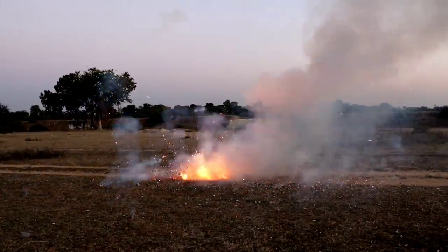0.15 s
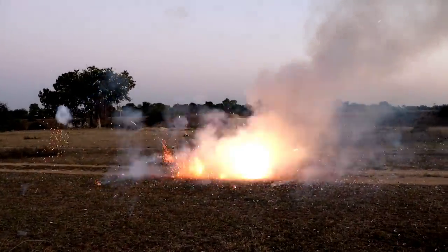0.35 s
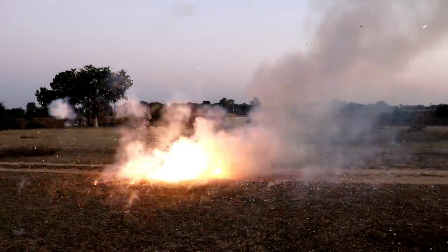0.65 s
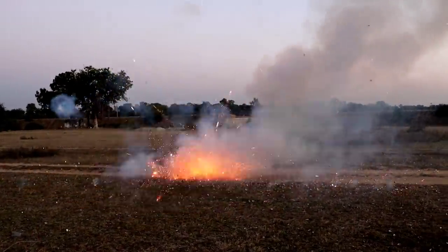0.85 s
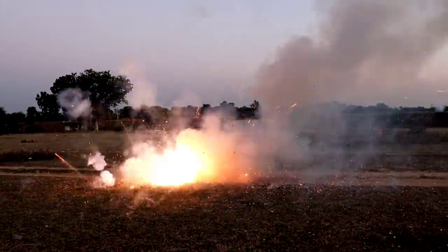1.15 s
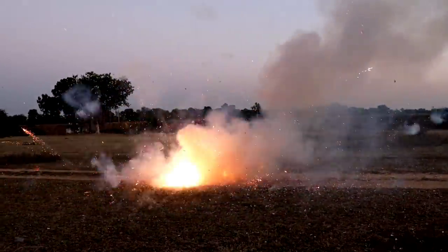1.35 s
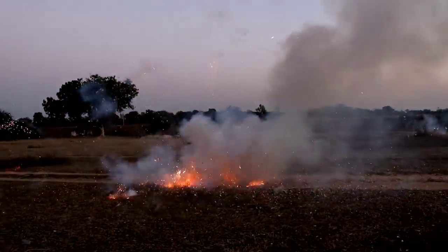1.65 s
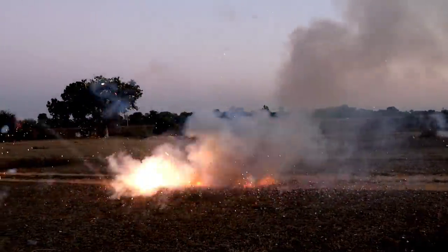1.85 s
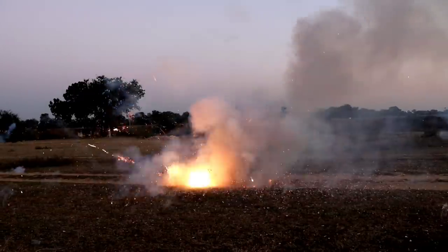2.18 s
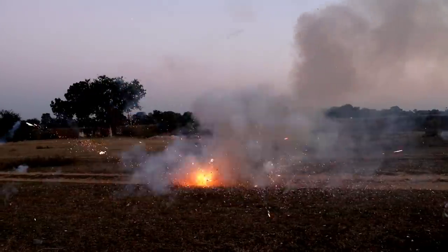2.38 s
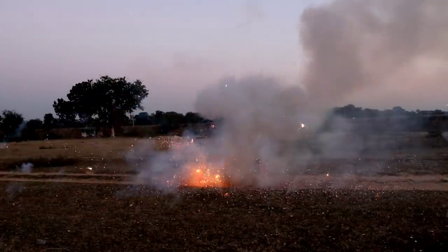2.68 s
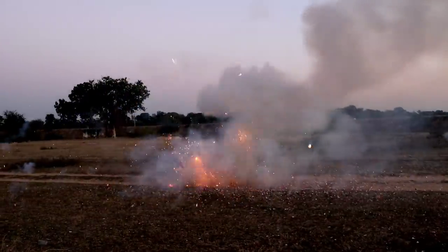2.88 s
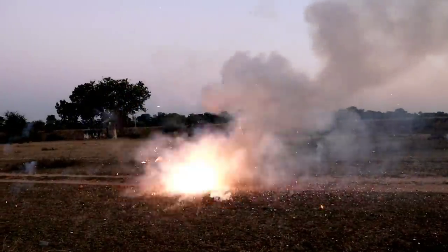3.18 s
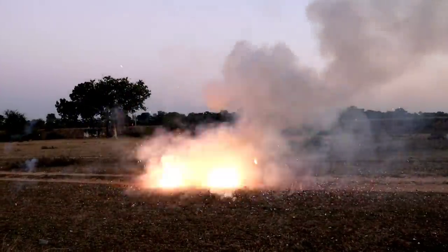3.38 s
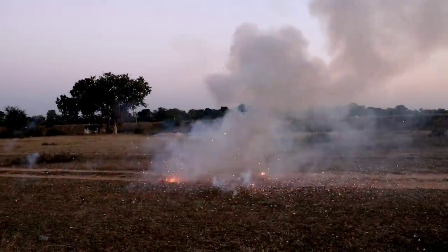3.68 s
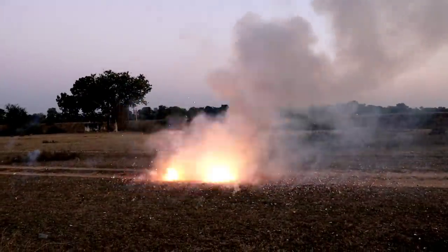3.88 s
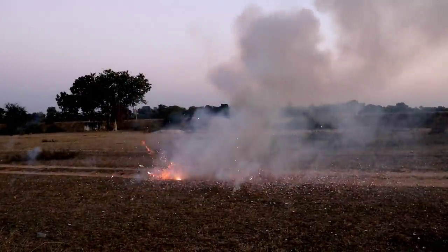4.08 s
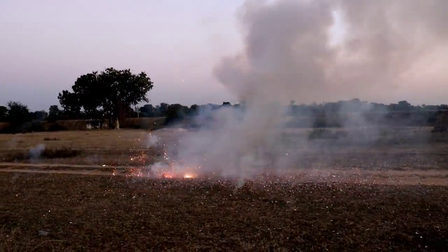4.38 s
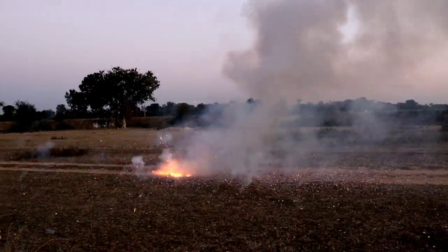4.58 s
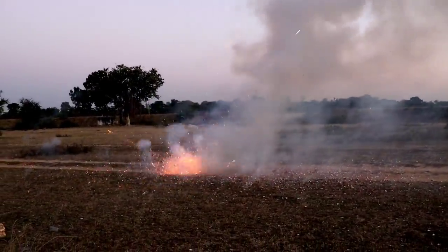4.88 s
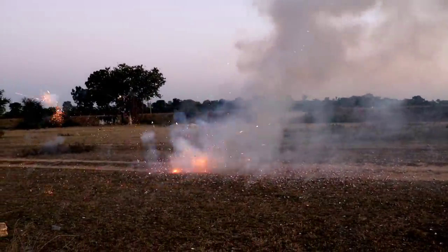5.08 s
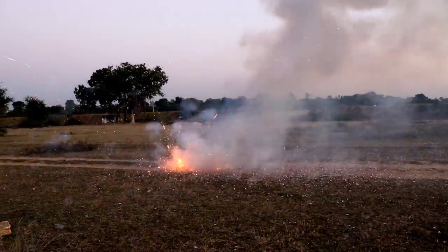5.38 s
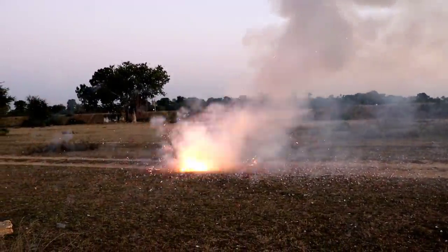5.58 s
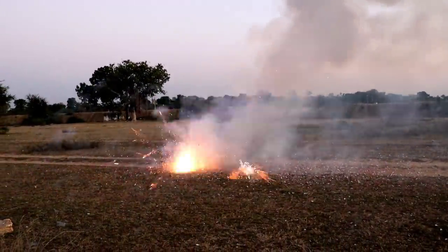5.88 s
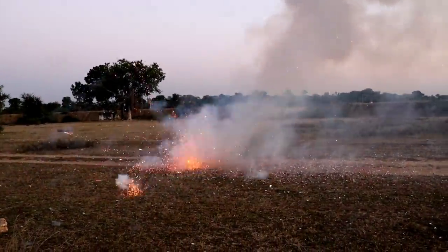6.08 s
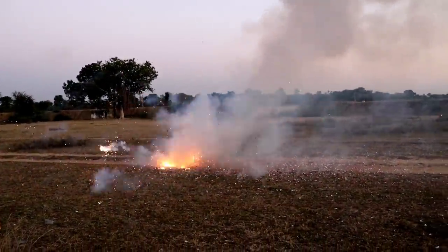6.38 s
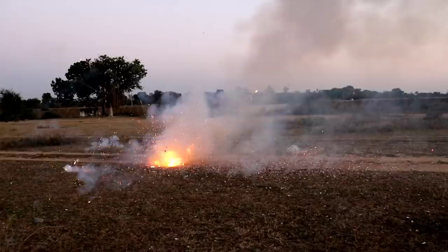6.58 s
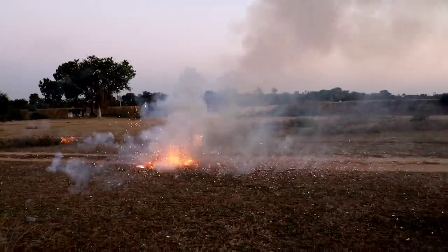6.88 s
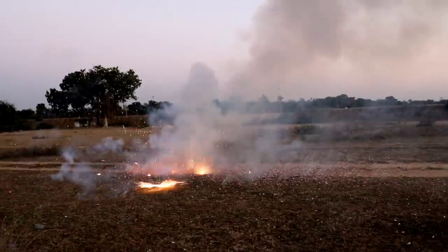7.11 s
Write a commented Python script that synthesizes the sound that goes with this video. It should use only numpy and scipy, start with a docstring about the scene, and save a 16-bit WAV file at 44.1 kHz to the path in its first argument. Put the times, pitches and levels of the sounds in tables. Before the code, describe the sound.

Dense, crackling firecracker chain outdoors, sharp distorted bangs and quick salvos slamming the microphone, with short dull scatter from ground, bushes and far trees.

```python
"""Over faint steady far noise a long string of firecrackers goes off in an open stubble field, singly and in salvos.
Each blast overloads a microphone: it jumps to its upper stop, slams to its lower stop and swings back.
Stubble, bushes and far trees scatter each bang as decaying patchy noise; a bank returns a short mid-pitched slap.
Soft muffled blasts and faint random pops come between: a rounded push, then a longer pull.
Gain control sinks while the bangs come thick."""
import sys
import numpy as np
from scipy import signal
from scipy.fft import rfft, irfft
from scipy.io import wavfile
from scipy.ndimage import uniform_filter1d

SR = 44100
rng = np.random.default_rng(int(sys.argv[2]) if len(sys.argv) > 2 else 0)


def pcm_store(signal):
    """Save signal as 16-bit PCM."""
    levels = np.round(np.clip(np.atleast_2d(signal), -1, 1) * 32767)
    wavfile.write(sys.argv[1], SR, levels.astype(np.int16).T)


N = 319720

# far echo spectrum: f/Hz, relative level/dB
FAR_SPECTRUM = [(40, -11), (260, -0.5), (900, -8), (2800, -23.5), (8500, -40.5), (16000, -52)]
# near scatter spectrum: f/Hz, relative level/dB
GROUND_SPECTRUM = [(100, 4), (500, 4), (1600, -6.5), (3900, -18.5), (7800, -20.5), (15000, -27.5)]
# single overloading blasts: t/s, swing back/share of travel 0-1, crack sharpness/dB
SINGLE_BLASTS = [(0.0106, 0.06, -32), (0.1273, 0.97, -12), (0.2631, 0.06, -15), (0.3293, 0.7, -14),
                 (0.3455, 0.83, -13), (0.3916, 0, -15), (0.4116, 0.3, -7), (0.4442, 0.05, -20),
                 (0.4594, 0.85, -11), (0.5984, 0.84, -9), (0.684, 0.5, -28), (0.711, 0.5, -7),
                 (0.7838, 0.47, -29), (0.848, 0.22, -11), (0.8689, 0.8, -7), (0.8888, 0.66, -22),
                 (0.9008, 0.08, -9), (0.9068, 0.66, -9), (0.9899, 0.94, -12), (1.0081, 0.15, -20),
                 (1.0257, 0.8, -2), (1.1783, 0.05, -17), (1.2761, 0.8, 1), (1.309, 0.09, -16),
                 (1.3496, 1, -28), (1.4235, 0.74, -21), (1.5345, 1, -17), (1.5553, 0.6, -24),
                 (1.6621, 0.07, -35), (1.745, 0.05, -31), (1.7973, 0.8, -25), (1.8457, 0.5, -11),
                 (1.8897, 0.73, -21), (1.98, 0.93, -10), (1.9935, 0.7, -11), (2.004, 0.85, -50),
                 (2.0231, 0.56, -22), (2.039, 0.87, -10), (2.0712, 0.97, -7), (2.0846, 0.3, -11),
                 (2.11, 0.95, -12), (2.1535, 1, -32), (2.1737, 0.4, -21), (2.314, 0.05, -34),
                 (2.496, 0.03, -18), (2.5158, 0.64, -5), (2.676, 0.35, -15), (2.7161, 0.02, -10.5),
                 (2.7506, 0.43, -5), (2.7816, 0.93, -7), (2.8817, 0.87, -8), (3.0127, 0.07, -7.5),
                 (3.0712, 0.9, 1), (3.097, 0.93, -23.5), (3.3364, 0.53, -8.5), (3.3555, 0.4, -4),
                 (3.3696, 0.97, -22), (3.3805, 0.09, -20), (3.5, 0.27, -19.5), (3.5346, 0.97, -16),
                 (3.5906, 0.85, -18.5), (3.6475, 1, -2), (3.6539, 0.23, -24), (3.9004, 0.04, -14),
                 (3.9327, 1, -21), (3.9767, 0.86, -21), (4.0513, .8, -10), (4.177, 0.6, -15.5),
                 (4.3079, 0.87, -27), (4.3105, 0.01, -20), (4.432, 1, -2), (4.456, 0.97, -7),
                 (4.4766, 0.65, -26), (4.555, 1, -19), (4.5899, 0.8, -6.5), (4.6047, 0.25, -25),
                 (4.8395, 0.7, -26), (4.867, 0.06, -30), (4.9224, 0.83, -22), (4.987, 0.1, -29),
                 (5.0215, 0.03, -28), (5.117, 0.08, -34), (5.2333, 0.25, -26), (5.3535, 1.0, -11.5),
                 (5.4407, 0.95, -4), (5.457, 0.38, -22), (5.485, 0.34, -8), (5.5872, 0, -15),
                 (5.6057, 0.03, -28), (5.6706, 1, -3), (5.6908, 0.98, -24), (5.7488, 0.07, -35),
                 (5.799, 0.22, -26), (5.957, 0.09, -25), (5.9663, 0.3, -10), (6.0082, 0.05, -9),
                 (6.0186, 1, -7), (6.0362, 1, -8), (6.049, 0.8, -8), (6.125, 0.46, -22), (6.1576, .6, -9),
                 (6.1883, 0, -23), (6.2022, 1, -5.5), (6.33, 0.73, -17), (6.354, 0.14, -13.5),
                 (6.4825, 0.29, -12.5), (6.511, 0.08, -23), (6.546, 0.96, -12), (6.5548, 0, -25),
                 (6.6151, 0.51, -19), (6.6837, 0.66, -13), (6.699, 0.97, -30), (6.7448, 0.54, -33),
                 (6.8296, 0.73, -22.5), (6.858, .2, -45), (6.8612, .9, -14), (6.8886, 0.95, -16),
                 (6.906, 0.88, -26), (6.927, 0.12, -25), (6.9659, 0.96, -24.5), (6.9988, 0.09, -25),
                 (7.0127, 0.35, -31), (7.0959, 0.65, -26), (7.1162, 0.74, -22), (7.1294, 0.65, -48),
                 (7.157, 1, -12), (7.1765, 0.14, -31), (7.199, 0.98, -20), (7.2081, 0.79, -35),
                 (7.2364, 1, -15)]
# quick salvos of neighbouring crackers: start t/s, length/ms, swing back after first blast/0-1,
# swing back after last/0-1, then any crackers in between/ms after start
CRACKER_SALVOS = [(0.1516, 3.14, 0.82, .9), (0.1974, 7.8, .1, .3, 3.2), (0.2696, 9.2, 0.8, 0.94, 4.1),
                  (0.3113, 8.3, 0.7, 0.98, 2.5, 4.6), (0.3524, 2.95, 0.85, 0.4), (0.4353, 1.4, .6, .04),
                  (0.4748, 10, .3, .4, 6), (0.5203, 12.1, .94, .98), (0.5573, 4.5, .3, 0.06),
                  (0.6104, 1.85, 0.9, 0.7), (0.6532, 2.7, .95, 0.03), (0.7294, 3.4, .3, 0.6),
                  (0.7519, 7.1, .09, 1), (0.7943, 2.4, 0.6, 0.2), (0.8123, 4.9, .3, .8, 2.8),
                  (0.8252, 2.7, 0.7, 0.43), (0.8562, 3.63, 0.7, .3), (0.9194, 5.0, 1, 0.93),
                  (0.9397, 6.26, .2, 0.06, 4), (0.9548, 10.2, 1, .03), (1.0331, 2.2, 0.2, 0.2),
                  (1.0543, 9.3, 0.83, .09, 3.5, 4.8), (1.0745, 18.7, .98, .97), (1.105, 2.2, .3, 0.96),
                  (1.1186, 4.4, .6, 0.07), (1.1338, 3, 0.2, 0.06), (1.1433, 1.3, .3, 0.9),
                  (1.1521, 11.4, 0.2, 0.87, 3.6, 7.6), (1.171, 3.9, 0.2, 1),
                  (1.188, 11, .3, 0.97, 2.8, 5.3, 7.2), (1.2264, 5.1, 0, 0.02), (1.24, 5.3, 0.93, 0.2),
                  (1.2864, 5.1, 0.64, 0.1), (1.329, 6.3, .75, 0.97, 1.8),
                  (1.3763, 14.9, 0.77, .6, 4.2, 7.9, 10), (1.4714, 1.4, 0.4, 0), (1.4879, 2.1, 0.4, 0),
                  (1.5045, 3.24, 0.79, 0.75), (1.514, 5.84, 0, 0.89), (1.6951, 2.8, 0.47, 0.06),
                  (1.782, 5.3, .7, 0.65, 2.4), (1.8998, 3.9, 0.14, 0.3), (1.9399, 5.3, 1, 0.09),
                  (2.053, 4.4, 0.56, 0.07), (2.2175, 8.7, .8, 1, 3.8, 6.3), (2.2584, 9.3, .67, .07),
                  (2.3237, 5.2, 0.77, .4, 3), (2.414, 1.42, 0.8, 0), (2.431, 4.2, 0.07, .4),
                  (2.4676, 9.4, .05, .96), (2.6424, 7.4, .66, .9), (2.6643, 5.5, 0.4, 0.84),
                  (3.0273, 5.3, 1, 0.3), (3.6421, 3.64, 0.82, 0.8), (4.1423, 3.7, 0.92, 0.7),
                  (4.8244, 7.1, 0.66, 0.74), (4.847, 3.3, 0, 0.06), (4.9564, 11.2, 0.8, .3, 5.8),
                  (5.001, 5.07, 0, 0.05), (5.2203, 1.55, .95, 0.03), (5.3159, 12.3, .84, .07),
                  (5.4223, 4.4, 0.65, 0.47), (5.4706, 4.38, 0.08, 0.02), (5.7242, 7.2, .52, .4),
                  (5.7809, 5.96, 0.8, 0.92), (5.8959, 11.4, .15, .1, 6), (5.9226, 13.1, 0, .93),
                  (5.945, 3.2, 0.33, 1), (5.9874, 10.2, .15, 0.05, 6), (6.0677, 3.7, 0, .96),
                  (6.1022, 12.2, .9, .97), (6.3694, 8, .9, 0.4, 1.4), (6.4919, 1.83, 0.34, 0.24),
                  (6.6319, 3.55, 1, .2), (6.648, 8.4, .63, 1), (6.712, 4.67, 0.87, .95), (6.768, 1.4, 1, 1),
                  (7.0196, 4.4, 0.39, 1.0), (7.0944, 1.2, 0, .5, .6)]
# crackers muffled by smoke and stubble, too soft to reach the stops: t/s, peak level/dB
MUFFLED_BLASTS = [(0.3753, -2.5), (2.3689, -15), (3.1161, -3.5), (4.735, -29), (4.758, -28.5), (5.1493, -6),
                  (5.7111, -19), (6.4075, -12)]

REST = 0.16  # idle position; lower stop 0, upper stop 1
FIRST_CRACK_DB, LATER_CRACK_DB = -15, -16  # smoke dulls the later crackers of a salvo
CRACK_SPREAD_DB = 4.0  # crackers differ in sharpness, +-
INNER_BACK, INNER_SPREAD = .75, .25  # swing back of crackers inside a salvo, and its stray
DIP_S, DIP_WIDTH_S, DIP_DEPTH = 0.00342, 0.00035, 0.28  # ground bounce suction; greatest depth
FLIP_HALF_WIDTH_S, FLIP_AT_S = .000022, np.array([-.00011, .00009, .0003])  # moments re slam, before stray
SLAP_DELAY_S, SLAP_SPREAD_S = 0.027, 0.002  # bank a few metres off
SLAP_HZ, SLAP_WIDTH_HZ, SLAP_DB = 1050, 790, -37
CEILING, EDGE_HZ = .97, 16500


def gain_of(db):
    """Amplitude factor of a level in dB."""
    return 10 ** (np.asarray(db) / 20)


def evened(x):
    """Scales x to rms 1."""
    return x / np.sqrt(np.mean(x ** 2) + 1e-20)


def fade(x, seconds):
    """Every impulse in x decays exponentially with this time constant."""
    return signal.lfilter([1], [1, -np.exp(-1 / (seconds * SR))], x)


def coloured(x, points):
    """Gives x the spectrum drawn by points, at rms 1."""
    f, db = np.transpose(points)
    hz = np.fft.rfftfreq(N, 1 / SR)
    level_db = np.interp(np.log(hz + 1), np.log(f), db)
    return evened(irfft(rfft(x) * gain_of(level_db), N))


def lumpy(lump_db, frames):
    """Noise in patches of time and pitch, as separate small echoes of different colour make it."""
    re, im, lumps = rng.standard_normal((N // 32 + 4, 65, 3)).T
    lumps = uniform_filter1d(lumps, max(round(frames), 1), axis=1)
    lumps = evened(uniform_filter1d(lumps, size=5, axis=0))
    spectrum = (re + 1j * im) * gain_of(lump_db * lumps)
    return signal.istft(spectrum, nperseg=128, noverlap=96)[1][:N]


def crackers():
    """All overloading blasts in order (s, swing back, crack dB), the salvos spread out into crackers."""
    blasts = [tuple(row) for row in SINGLE_BLASTS]
    strays = rng.uniform(-1, 1, (len(CRACKER_SALVOS), 2, 5))
    for (s, ms, first, last, *inner), (swing, sharp) in zip(CRACKER_SALVOS, strays):
        at = s + np.array([0, *inner, ms]) / 1000
        k = np.arange(len(at))
        inner_backs = INNER_BACK + INNER_SPREAD * swing[:len(inner)]
        backs = np.clip([first, *inner_backs, last], 0, 1)
        crack_db = np.where(k > 0, LATER_CRACK_DB, FIRST_CRACK_DB) + CRACK_SPREAD_DB * sharp[k]
        blasts += zip(at, backs, crack_db)
    return sorted(blasts)


def scatter(blasts):
    """Bangs return from stubble at once, bushes soon after, far trees for long, over a steady far floor."""
    power = np.zeros(N)
    for s, *_ in blasts:
        power[round(s * SR)] = gain_of(3.6 * rng.standard_normal())  # true power differs, though all overload
    for s, db in MUFFLED_BLASTS:
        power[round(s * SR)] = gain_of(2 * db)  # amplitude dB to power
    stubble = coloured(lumpy(4.65, 2.2), GROUND_SPECTRUM)
    bushes = evened(fade(coloured(lumpy(4.1, 4.1), GROUND_SPECTRUM), .00004))  # duller
    trees = coloured(lumpy(4.7, 18.0), FAR_SPECTRUM)
    near = gain_of(-11.5) * np.sqrt(fade(power, 0.0016)) * stubble
    middle = gain_of(-30.5) * np.sqrt(fade(power, 0.013)) * bushes
    far = gain_of(-55.5) * np.sqrt(3 + fade(power, 0.11)) * trees  # 3: steady floor
    return near + middle + far


def diaphragm(blasts):
    """Position of the overloaded microphone between its stops, and how freely it follows soft sound."""
    place, free = np.full(N, REST), np.ones(N)
    chance = rng.random((len(blasts), 2))
    moments = FLIP_AT_S * (.6 + .9 * rng.random((len(blasts), len(FLIP_AT_S))))
    lead = 88  # samples ahead of the slam
    for (s, back, crack_db), (pin, tug), flip_s in zip(blasts, chance, moments):
        start = round(s * SR)
        span = slice(start - lead, start + SR // 4)
        before = place[span]
        u = (np.arange(len(before)) - lead) / SR  # s after the slam

        edge_s = .000028 * gain_of(-.47 * min(crack_db + 21, 0))  # a dull blast has slower edges
        top = max(1 - 0.44 * max(before[60] - REST, 0), before[60])  # still displaced: less room above
        front = .5 + .5 * np.tanh((u + 0.00038) / edge_s)
        creep = np.exp(np.minimum(u, 0) / 0.00083)
        rise = np.clip(0.82 * front + 0.16 * creep, 0, 1)
        slam = .5 - .5 * np.tanh(u / edge_s)

        since = np.maximum(u - .00092 - 0.00019 * pin, 0)  # suction behind the blast pins it down first
        release = 1 - np.exp(-since / (.00008 + 0.0006 * (1 - back)))
        swing = (REST + (back - REST) * np.exp(-since / 0.042)) * release
        new = (before + (top - before) * rise) * slam + swing
        dip = np.exp(-((u - DIP_S) / DIP_WIDTH_S) ** 2)
        new -= DIP_DEPTH * tug ** 2 * (1 - back ** 10) * dip

        # sharp blasts flip it briefly to the other stop: before the slam, sharper ones again after it
        height = np.clip(4.5 * gain_of(crack_db) - np.array([.2, .7, 2.2]), 0, 1.6)
        flips = np.sign(flip_s) * height
        new += flips @ np.exp(-((u - flip_s[:, None]) / FLIP_HALF_WIDTH_S) ** 2)
        place[span] = np.clip(new, 0, 1)

        # nearly deaf for a while if left at the lower stop; hard of hearing near the upper
        deaf = 1 - np.clip(1.5 - 16 * back, 0, .95) * np.exp(-np.maximum(since - .015, 0) / 0.028)
        hard = 1 - np.clip(0.99 * back ** 3, 0, 1) * np.exp(-since / 0.019)
        free[span] = np.where(u < 0, free[span], deaf * hard * (since > 0))
    return place - REST, free


def slaps(blasts):
    """One short ragged bank echo per blast, band-passed noise, some much stronger than others."""
    late, size = rng.uniform(-1.29, 1, (len(blasts), 2)).T
    at = np.array(blasts)[:, 0] + SLAP_DELAY_S + SLAP_SPREAD_S * late
    power = np.zeros(N)
    power[(at * SR).astype(int).clip(0, N - 1)] = gain_of(15 * size)
    t = np.arange(-400, 401) / SR
    bump = np.exp(-(t / SLAP_SPREAD_S) ** 2)
    shape = np.sqrt(abs(signal.oaconvolve(power, bump, "same")))
    band = signal.iirpeak(SLAP_HZ, SLAP_HZ / SLAP_WIDTH_HZ, fs=SR)
    noise = signal.lfilter(*band, rng.standard_normal(N))
    return gain_of(SLAP_DB) * shape * evened(noise)


def muffled(blasts):
    """Soft blasts, a rounded push and a longer pull; faint ones pop at random in the wake of loud bangs."""
    u = np.arange(400) / SR / 0.00041
    blast = u ** 2 * np.exp(-u) * (1 - u / 3.6)
    bangs = np.zeros(N)
    bangs[[round(row[0] * SR) for row in blasts]] = 1
    pops = rng.random(N) < 14 / SR * fade(bangs, .018)  # 14 pops/s right after a lone bang
    sizes = pops * gain_of(-33 + 2.3 * rng.exponential(1, N).clip(0, 2.2))
    for s, db in MUFFLED_BLASTS:
        sizes[round(s * SR) - 40] = gain_of(db)
    return signal.oaconvolve(sizes, blast / blast.max())[:N]


def scene():
    """Diaphragm travel and muffled blasts, plus echoes as far as the microphone is free to follow them."""
    blasts = crackers()
    place, free = diaphragm(blasts)
    echoes = scatter(blasts) + slaps(blasts)
    return (gain_of(0.5) * place + muffled(blasts) + free * echoes)[None]


def record(dry):
    """Two bass cuts bend flat stops into slopes; gain control follows recent power; treble rolls off; peaks clip."""
    x = signal.lfilter(*signal.butter(N=1, Wn=200, btype="high", fs=SR), dry)
    x = signal.lfilter(*signal.butter(N=2, Wn=45, btype="high", fs=SR), x)
    power_db = 10 * np.log10(fade(x[0] ** 2, 0.18) / (.15 * SR) + 1e-12)
    x = x / gain_of(.5 * np.maximum(power_db + 21.5, 0))  # 2:1 above -21.5 dB
    treble_hz = [0, 6000, 10000, 15000, 15600, SR / 2]
    treble = gain_of([0.0, -.3, -1.6, -4, -10.5, -28])
    x = signal.oaconvolve(x, signal.firwin2(127, treble_hz, treble, fs=SR)[None], "same")
    x = np.clip(x, -CEILING, CEILING)
    lowpass = signal.firwin(255, EDGE_HZ, window=("kaiser", 9), fs=SR)
    return signal.oaconvolve(x, lowpass[None], "same")


dry = scene()
out = record(dry)
pcm_store(out)
```